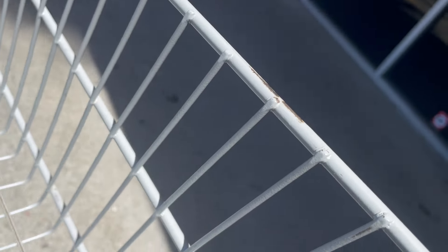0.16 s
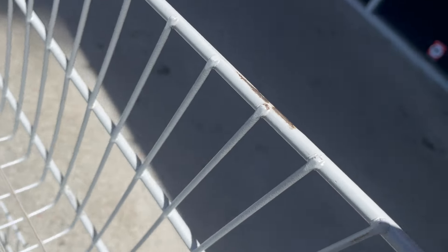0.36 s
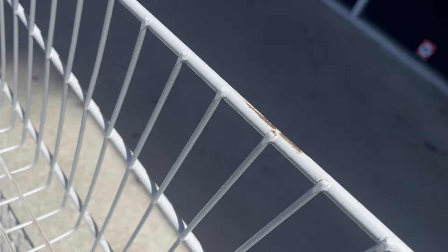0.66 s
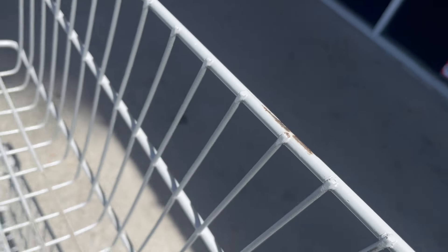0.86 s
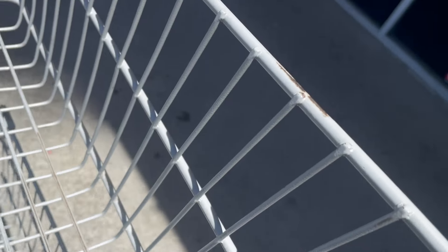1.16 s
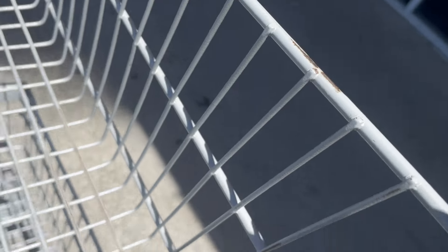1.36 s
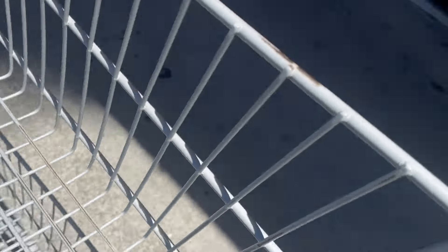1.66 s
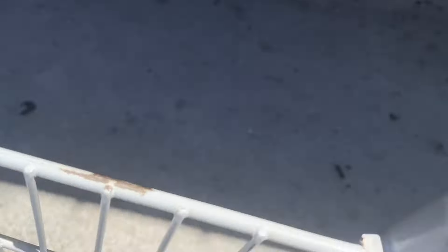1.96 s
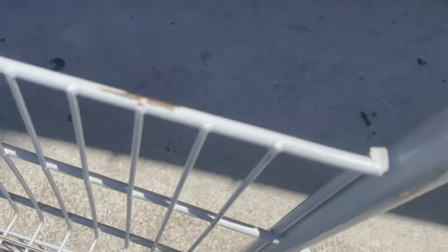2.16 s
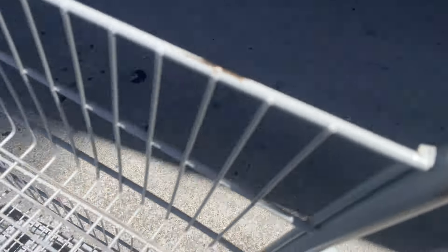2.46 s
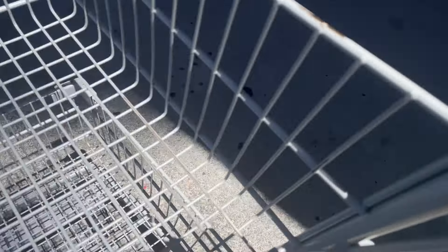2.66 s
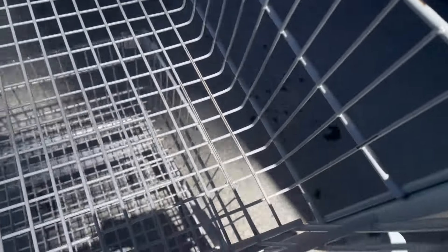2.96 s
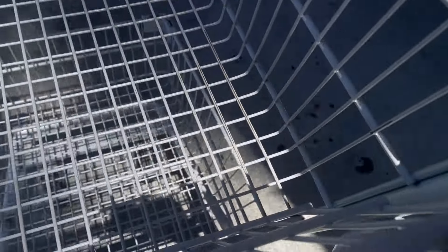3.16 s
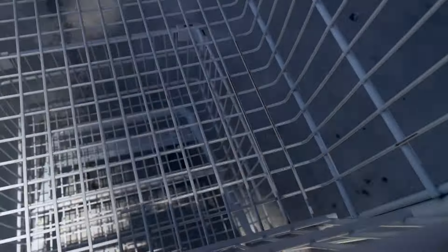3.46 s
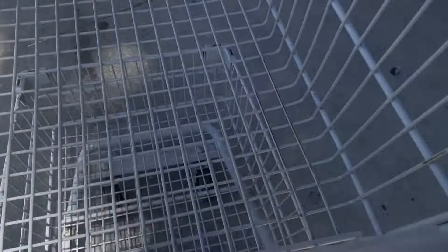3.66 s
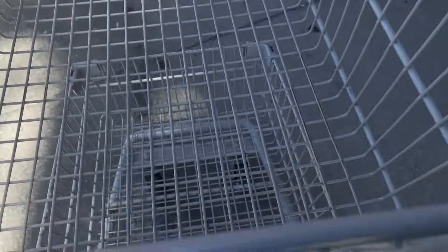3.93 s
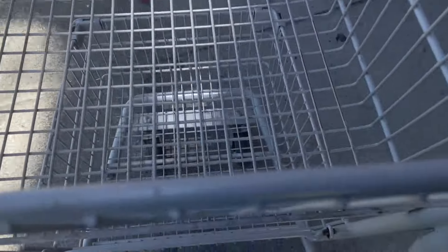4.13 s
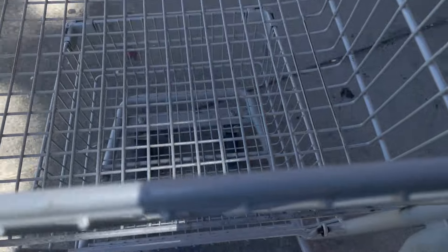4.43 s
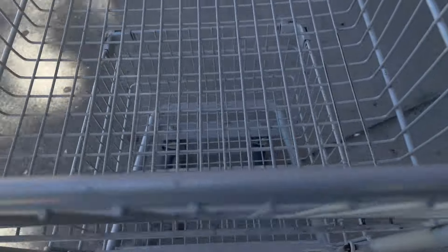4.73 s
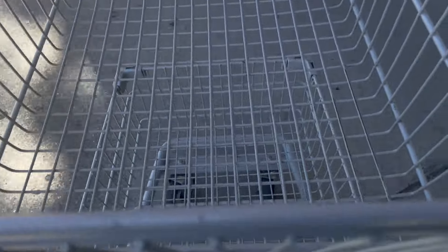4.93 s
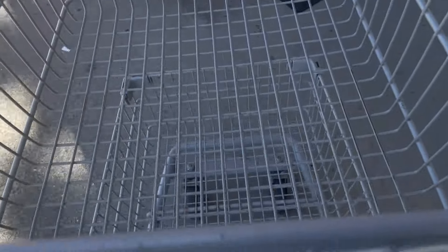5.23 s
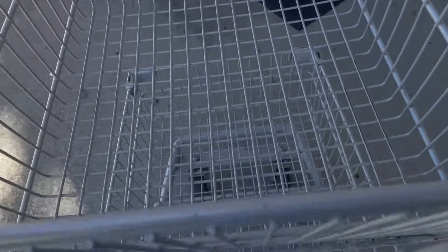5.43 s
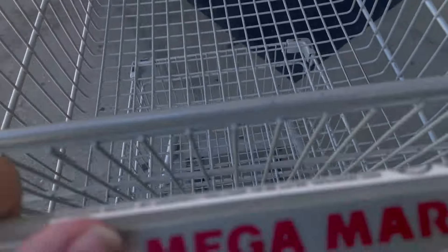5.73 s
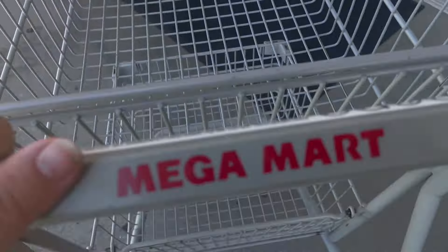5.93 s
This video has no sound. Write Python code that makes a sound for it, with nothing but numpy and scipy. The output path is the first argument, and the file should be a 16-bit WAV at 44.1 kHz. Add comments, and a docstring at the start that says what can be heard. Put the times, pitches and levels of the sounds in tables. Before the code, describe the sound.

Close-up metallic rattle of a shopping cart pushed across pavement, calm at first, then jolting hard with bright clatter and knocks before easing off.

```python
"""A wire shopping cart is pushed over asphalt: the rough ground shakes the basket, whose wires chatter in
dense ticks. Jolts set off louder bursts and dry cracks, and the wheels rumble, thud and ring through the frame.
Hollow knocks sound on the frame. A nearby engine hums, sinks in pitch and fades, over a low drone.
Noise, ticks and sine tones are shaped by resonances and level curves. Two close microphone ports
of a hand-held recorder hear it, with a phase turn between them."""
import sys
import numpy as np
from scipy import signal
from scipy.fft import rfft, irfft, next_fast_len
from scipy.io import wavfile
from scipy.ndimage import uniform_filter1d

SR = 44100
rng = np.random.default_rng(int(sys.argv[2]) if len(sys.argv) > 2 else 0)


def wav_out(sig):
    """Save sig, one row per channel (or a flat mono array), as 16-bit PCM at SR to the path in sys.argv[1]."""
    wavfile.write(sys.argv[1], SR, np.round(np.clip(np.atleast_2d(sig).T, -1, 1) * 32767).astype(np.int16))


N = 268821
PADDED = next_fast_len(N)
T = np.arange(N) / SR
FREQS = np.maximum(np.fft.rfftfreq(PADDED, 1 / SR), 1)


def from_db(db):
    """Turn decibels into gain."""
    return 10 ** (np.asarray(db) / 20)


def rms_one(x):
    """Scale to an average strength (rms) of 1."""
    return x / np.sqrt(np.mean(x ** 2) + 1e-20)


def in_time(rows):
    """Read the columns of a time table at every sample."""
    s, *columns = np.transpose(rows)
    return [np.interp(T, s, column) for column in columns]


def in_pitch(rows):
    """Read the columns of a frequency table at every FFT bin."""
    hz, *columns = np.transpose(rows)
    return [np.interp(np.log(FREQS), np.log(hz), column) for column in columns]


def colour(x, spectrum):
    """Filter x by a spectrum table, then scale to rms 1."""
    gain = from_db(in_pitch(spectrum)[0])
    return rms_one(irfft(rfft(x, PADDED) * gain, PADDED)[:N])


def drift(rate):
    """Slow random wander of rms 1, drawn at every 20th sample; a higher rate wanders faster."""
    r = np.exp(-40 * np.pi * rate / SR)
    noise = rng.standard_normal(N // 20 + 2002)
    slow = signal.lfilter([1], [1, -2 * r, r * r], noise)[2000:]
    return np.interp(np.arange(N) / 20, np.arange(len(slow)), rms_one(slow))


def resonate(x, hz, width_hz):
    """A part that rings at one pitch, with gain 1 at its peak; narrow ones ring longer."""
    r = np.exp(-np.pi * width_hz / SR)
    top = [(1 - r * r) / 2, 0, (r * r - 1) / 2]
    return signal.lfilter(top, [1, -2 * r * np.cos(2 * np.pi * hz / SR), r * r], x)


def wandering(x, hz, width_hz):
    """Three neighbours 1.8 % apart in pitch swell and fade separately, so the ring shifts and breaks up."""
    rings = [from_db(5 * drift(17.5)) * resonate(x, hz * (1 + k * 0.018), width_hz) for k in (-1, 0, 1)]
    return sum(rings) / 2


def chord(x, modes, ring=resonate):
    """Several resonances side by side, scaled together to rms 1."""
    return rms_one(sum(from_db(level_db) * ring(x, hz, width) for hz, width, level_db in modes))


def ticks(per_s, spread_db):
    """Random contacts of uneven strength, scaled to rms 1."""
    sizes = from_db(spread_db * np.minimum(rng.exponential(1, N), 5)) * rng.choice([-1, 1], N)
    return rms_one(sizes * (rng.random(N) < per_s / SR))


def lagged(x, lag_s):
    """Follow x smoothly, with lag_s as the time constant."""
    pole = np.exp(-1 / (lag_s * SR))
    return signal.lfilter([1 - pole], [1, -pole], x)


# jolts of the basket: (time [s], burst level [dB], shiver level [dB], first-contact snap level [dB])
BASKET_JOLTS = [(0.283, -31, -29.5, -28), (0.5639, -37, -36, -31), (0.6774, -34.5, -32.5, -30),
                (0.791, -44, -43, -37), (1.076, -43, -52, -35), (1.2344, -50, -28, -38),
                (1.249, -50, -39, -34), (1.267, -30, -50, -22), (1.328, -28, -56, -22),
                (1.498, -32, -33, -28), (1.545, -31, -40.5, -34), (1.682, -34, -41, -37),
                (2.01, -32.5, -39.5, -14), (2.056, -38.5, -60, -26), (2.3045, -46, -44.5, -21),
                (2.371, -34, -55, -34), (2.386, -31, -39, -26), (2.395, -45, -57, -25),
                (2.508, -40, -57, -27), (2.563, -35, -48, -35), (2.571, -31, -55, -21),
                (2.602, -32, -50, -24), (2.6177, -21.5, -28.5, -15), (2.63, -28, -45, -14),
                (2.692, -25, -43, -20), (2.721, -26, -47, -14), (2.818, -40, -50, -25),
                (2.868, -30.5, -50, -15), (2.878, -29, -25, -8), (2.947, -23, -48, -24),
                (2.963, -24, -48, -6.5), (3.1104, -22, -22, -7.5), (3.1426, -23, -45, -11),
                (3.1948, -22.5, -45, -4), (3.262, -42, -45, -11), (3.318, -26, -45, -8),
                (3.329, -23, -24, -2.5), (3.338, -28, -50, -3), (3.398, -29, -50, -16),
                (3.448, -26, -50, -9), (3.461, -27, -50, -12), (3.538, -29, -50, -4), (3.549, -34, -52, -9),
                (3.612, -49, -50, -28), (3.882, -35, -50, -8), (3.982, -28, -53, -8.5),
                (4.06, -27, -35, -12), (4.173, -27, -39, -15), (4.291, -32, -42, -14),
                (4.552, -32, -31.5, -25), (4.669, -28.5, -55, -22), (4.704, -23.5, -47, -25),
                (4.7322, -26, -40, -8), (4.769, -21.5, -40, -20), (4.811, -29, -44, -18),
                (4.823, -38, -50, -14), (5.047, -31, -79, -29), (5.1084, -18, -53, -19),
                (5.1157, -35, -24, -3.5), (5.157, -27, -50, -10), (5.178, -42, -50, -10),
                (5.288, -32, -48, -14), (5.408, -40, -63, -17), (5.524, -42, -51, -24),
                (5.601, -35, -59, -28), (5.8352, -29.5, -44, -11), (5.973, -34, -43.5, -35)]


def jolt_power(column, t60):
    """Each jolt starts at once, then its power falls 60 dB in t60 seconds."""
    kicks = np.zeros(N)
    rows = np.array(BASKET_JOLTS)
    kicks[np.round(rows[:, 0] * SR).astype(int)] = from_db(2 * rows[:, column])
    return signal.lfilter([1], [1, -from_db(-2 * 60 / t60 / SR)], kicks + 1e-18)


# steady shaking of the basket by the ground:
# (time [s], rattle level [dB], treble tilt [dB], frame-tube ring level [dB])
GROUND_SHAKING = [(0, -37, 6, -11), (.27, -45.5, -0.5, -5.5), (1.22, -50.5, -2, 1), (2.0, -51.5, 1.5, 1.5),
                  (2.36, -72, -41, 11), (2.42, -35.5, -19, -8), (2.58, -45.5, -18, -5), (2.66, -29, 0, -15),
                  (3.07, -30, -3.5, -9), (3.2, -26.5, 4, -7), (3.58, -23, 6.5, -10), (3.69, -29, 4, -4),
                  (3.87, -24.5, 9.5, 0), (4.18, -38.5, -0.5, -1), (4.69, -38.5, -6, 2.5),
                  (4.72, -30.5, 1, 5.5), (4.83, -23.5, 11, -0.5), (4.97, -39, -1.5, -3),
                  (5.08, -38.5, -7, 6), (5.14, -40.5, 18, 18), (5.3, -38.5, 8.5, 8.5), (5.6, -40, 1.5, -8),
                  (5.72, -45.5, -9, -29), (5.98, -40, -1, -20), (6.1, -55, -7, 17)]


def shaking():
    """Power of steady shaking plus shiver, power of bursts, and dB by which jolts lift the steady part."""
    steady = from_db(2 * in_time(GROUND_SHAKING)[0])
    # a jolt clatters briefly, while the shiver spreads through the mesh and lasts longer
    shiver = lagged(jolt_power(column=2, t60=0.62), lag_s=0.041)
    burst = lagged(jolt_power(column=1, t60=0.15), lag_s=0.00061)
    return steady + shiver, burst, 10 * np.log10(1 + (shiver + burst) / steady)


def mesh(x, t60, count=4):
    """Contacts fall on several mesh parts, each a crowd of modes; high ones die first, t60 is at 4 kHz."""
    t, out = np.arange(SR // 5) / SR, np.zeros(N)
    part = rng.integers(0, count, N)
    for k in range(count):
        hz, phase = rng.uniform(705.2, 15500, 150), rng.uniform(0, 2 * np.pi, 150)
        decay = np.log(1000) / t60 * np.sqrt(hz / 4000)
        waves = np.sin(2 * np.pi * np.outer(hz, t) + phase[:, None])
        modes = np.sqrt(decay)[:, None] * np.exp(-np.outer(decay, t)) * waves
        bins = rfft(modes.sum(0))
        # even out clumps of modes
        even = irfft(bins / np.sqrt(uniform_filter1d(abs(bins) ** 2, size=81) + 1e-9), len(t))
        out += signal.fftconvolve(x * (part == k), rms_one(even) / np.sqrt(len(t)))[:N]
    return out


# overall colour of the basket: (frequency [Hz], level [dB per Hz])
BASKET_SPECTRUM = [(600, -102), (1200, -6), (2000, -1), (3000, -1), (4000, 0.5), (5200, -5), (8000, -7),
                   (12000, -10), (13500, -14), (15500, -70)]


def pings(strength):
    """Thirty wires of different pitch are struck at random and ring briefly."""
    taps, wire = strength * ticks(per_s=400, spread_db=3.3), rng.integers(0, 30, N)
    pitches = np.geomspace(1700, 7800, 30) * rng.uniform(0.94, 1.03, 30)
    rings = sum(resonate(taps * (wire == k) + 1e-18, hz, 2.4 * hz / 410) for k, hz in enumerate(pitches))
    return np.sqrt(np.mean(strength ** 2)) * colour(rings, BASKET_SPECTRUM)


# strongest wire resonances: (frequency [Hz], width [Hz], level [dB])
STRONG_WIRES = [(3580, 470, 4), (3780, 50, 7), (4620, 38, 9.5), (6300, 23, 10.5), (6010, 136, 3.5),
                (7100, 25, -7), (8880, 650, 0), (11300, 49.2, -4)]
# colour of the basket as the recorder turns toward it:
# (time [s], lift near 3.2 kHz [dB], lift near 6 kHz [dB], strongest-wire ring level [dB])
RECORDER_FACING = [(0, 3.5, -9, -4.5), (1.2, 6.5, -19.5, 3), (1.9, 5, -0.5, -7), (2.52, -0.5, -7.5, -6),
                   (2.66, -2.5, 1, -3.5), (4.6, 2.5, -4, 1.5), (5.5, 5, 0, 0), (6.1, 8.5, 4.5, 5)]
FRESH_TREBLE, FRESH_TUBE = 0.91, -0.82  # change in dB per dB that jolts stand above the steady shaking


def basket():
    """Wires chatter on the mesh, a few wires and the frame tube ring out; a fresh jolt is brighter."""
    _, tilt_db, tube_db = in_time(GROUND_SHAKING)
    rattle, burst, fresh_db = shaking()

    # loose wires add sparse stray taps to the dense chatter
    chatter = ticks(per_s=1400, spread_db=1) + 0.28 * ticks(per_s=90, spread_db=0.53)
    flutter = from_db(2.06 * drift(35) + 1.37 * drift(24.0))
    force = np.sqrt(rattle) * flutter * chatter + np.sqrt(burst) * ticks(4000, 0.8)
    scale = np.sqrt(np.mean(force ** 2))

    crowd = scale * colour(mesh(force, t60=0.084) + 0.16 * force, BASKET_SPECTRUM)
    crowd = crowd + from_db(-4.5) * pings(np.sqrt(rattle + burst))
    *lifts_db, wires_db = in_time(RECORDER_FACING)
    for (hz, width), lift_db in zip([(3200, 1930), (6000, 2800)], lifts_db):
        crowd = crowd + (from_db(lift_db) - 1) * resonate(crowd, hz, width)

    treble = irfft(rfft(crowd, PADDED) / (1 + (7000 / FREQS) ** 4), PADDED)[:N]
    bright_db = np.minimum(tilt_db + FRESH_TREBLE * fresh_db, 12.0)
    treble_gain = from_db(bright_db) + 0.21 - from_db(3.0)

    wires = sum(from_db(level_db + wires_db + 4.2 * drift(6.0)) * resonate(force, hz, width)
                for hz, width, level_db in STRONG_WIRES)
    tube_gain = from_db(tube_db + FRESH_TUBE * fresh_db + 2.5 * drift(5.9))
    tube = scale * tube_gain * rms_one(wandering(force, hz=2474, width_hz=104))
    return from_db(1.0) * crowd + treble_gain * treble + wires + tube


# wheels on the ground: (time [s], rumble level [dB], rolling noise level [dB], castor drone level [dB])
WHEEL_LEVELS = [(0, -27, -34, -65), (.64, -32.5, -36, -47), (1.24, -29, -31, -85), (1.4, -33.5, -33.5, -74),
                (2.0, -30, -35, -47), (2.25, -28.5, -36.5, -64), (2.6, -26.5, -33.5, -35),
                (3.0, -31.5, -31, -33.5), (3.92, -33, -39, -33), (4.1, -36, -36.5, -38.5),
                (4.68, -37, -39.5, -41), (4.75, -30, -36.5, -30.5), (4.97, -35.5, -42.5, -44),
                (5.12, -30, -36.5, -31), (5.27, -39, -43.5, -40), (5.7, -37.5, -41, -53.5),
                (6.1, -35, -39, -74)]
# colour of the rumble: (frequency [Hz], level [dB per Hz])
RUMBLE_SPECTRUM = [(15, -33), (30, 1.5), (55, 18.5), (85, 20.5), (130, 15), (200, -65)]


def wheel_rumble():
    """Low-coloured noise whose level wanders quickly, so the rumble is lumpy."""
    rumble_db = in_time(WHEEL_LEVELS)[0]
    return from_db(rumble_db + 2.0 * drift(44.0)) * colour(rng.standard_normal(N), RUMBLE_SPECTRUM)


# colour of the rolling noise: (frequency [Hz], level [dB per Hz])
ROLLING_SPECTRUM = [(90, -7), (150, 2), (235, -1.5), (300, -6), (400, -12), (550, -10), (750, -11),
                    (1050, -9.5), (1500, -18), (3000, -44)]


def rolling_noise():
    """The grain of the asphalt taps the wheels; fresh jolts add a slight thump."""
    level_db = in_time(WHEEL_LEVELS)[1] + 0.082 * shaking()[2]
    return from_db(level_db + 2.0 * drift(13.0)) * colour(ticks(2500, 2.54), ROLLING_SPECTRUM)


# castor resonances: (frequency [Hz], width [Hz], level [dB])
CASTOR_MODES = [(506, 40, -2.5), (680, 45, -6.5), (1472, 68, 3.5)]


def castor_drone():
    """Ticks ring the castors, whose shifting resonances make a drone."""
    castor_db = in_time(WHEEL_LEVELS)[2]
    return from_db(castor_db + 1.95 * drift(11.7)) * chord(ticks(1500, 1.9), CASTOR_MODES, wandering)


# engine hum: (time [s], pitch [Hz], level [dB])
ENGINE_HUM = [(0, 123.8, -20), (.35, 129, -26.5), (.6, 125.7, -23), (.9, 128, -29), (1.1, 125.7, -23),
              (1.8, 124.1, -35.5), (2.2, 117.5, -30.5), (2.55, 112.3, -25), (2.7, 112.4, -23.5),
              (2.83, 112.6, -17), (2.92, 111.7, -19), (3.05, 107.1, -27), (3.15, 100.7, -33),
              (3.3, 98, -60)]


def engine():
    """A near-pure firing tone that wavers a little in pitch and level, and fades out at its last point."""
    hz, level_db = in_time(ENGINE_HUM)
    phase = 2 * np.pi * np.cumsum(hz + 0.9 * drift(4.3)) / SR
    fade = np.clip((ENGINE_HUM[-1][0] + 0.076 - T) / 0.11, 0, 1)
    return np.sqrt(2) * fade * from_db(level_db + 2.5 * drift(5.4)) * np.sin(phase)


# drone resonances: (frequency [Hz], width [Hz], level [dB])
DRONE_MODES = [(151.4, 6.2, 1), (230.3, 5.9, -2)]


def low_drone():
    """Noise through narrow resonances: a drone under the hum that fades at 11 dB/s from 3 s on."""
    level_db = -37.5 - 11 * np.maximum(T - 3, 0)
    return from_db(level_db) * chord(rng.standard_normal(N), DRONE_MODES)


# hollow knocks on the frame: (time [s], level before the soft start [dB], pitch [Hz])
FRAME_KNOCKS = [(.006, -16, 766), (.059, -23.5, 800), (.155, -28.5, 756), (1.974, -26, 506),
                (1.986, -27, 780), (2.003, -28, 1710), (2.026, -33, 450), (2.409, -23.5, 2700),
                (2.51, -30, 2670), (2.564, -27.5, 1110), (2.414, -31, 1610), (4.071, -17, 1430),
                (4.275, -31, 816), (4.706, -16.5, 1840), (4.707, -14, 2630), (4.712, -19.5, 1496),
                (5.094, -20, 1466), (5.834, -17, 6630)]
KNOCK_T60_S, KNOCK_ATTACK_S = 0.08, 0.00047
KNOCK_LEAD = 2.1  # radians by which the right port leads


def knocks():
    """Short hollow rings with a soft start, each with a weaker second mode 7 % higher."""
    out, after = np.zeros((2, N + SR // 5)), np.arange(SR // 5) / SR
    lead = np.array([[0], [KNOCK_LEAD]])
    for s, level_db, hz in FRAME_KNOCKS:
        shape = (1 - np.exp(-after / KNOCK_ATTACK_S)) * from_db(level_db - 60 * after / KNOCK_T60_S)
        tones = sum(gain * np.sin(2 * np.pi * ratio * hz * after + lead)
                    for ratio, gain in [(1, 1), (1.07, from_db(-8))])
        out[:, round(s * SR):][:, :len(after)] += shape * tones
    return out[:, :N]


# short wires that clink at each snap: (frequency [Hz], width [Hz], level [dB])
CLINKING_WIRES = [(3590, 140, 3.5), (5950, 140, -0.5), (6670, 106, -4.5), (7800, 220, -9)]


def snaps(t60):
    """The first contact of a jolt: a dry crack of a few milliseconds that makes short wires clink."""
    out, after = np.zeros(N + 1000), np.arange(1000) / SR
    noises = rng.standard_normal((len(BASKET_JOLTS), 1000))
    for (s, _, _, snap_db), noise in zip(BASKET_JOLTS, noises):
        out[round(s * SR):][:1000] += np.sign(noise) * from_db(snap_db - 60 * after / t60)
    band = signal.butter(2, [450, 12000], "band", fs=SR, output="sos")
    crack = signal.sosfilt(band, out[:N] + 1e-18)
    clinks = sum(from_db(level_db) * resonate(crack, hz, width) for hz, width, level_db in CLINKING_WIRES)
    return 0.89 * crack + clinks


# dull thuds of a wheel over a bump: (time [s], starting noise level before the filter [dB])
WHEEL_THUDS = [(1.24, -16), (1.987, -34), (2.962, -19), (4.708, -16), (5.107, -24)]


def thuds():
    """A broad dull knock of noise that starts at once and falls 60 dB in 0.35 s, cut off after 0.25 s."""
    out, after = np.zeros(N + SR // 4), np.arange(SR // 4) / SR
    noises = rng.standard_normal((len(WHEEL_THUDS), SR // 4))
    for (s, level_db), noise in zip(WHEEL_THUDS, noises):
        out[round(s * SR):][:SR // 4] += noise * from_db(level_db - 60 * after / 0.35)
    return signal.lfilter(*signal.butter(1, [180, 2170], "band", fs=SR), out[:N])


# basket-floor resonances: (frequency [Hz], width [Hz], level [dB])
FLOOR_MODES = [(380, 95, 2), (614, 60, 7.1), (751, 37, 10.2)]


def floor_boom():
    """The basket floor rings 4 dB below the castor level setting, after a steep rise up to 3.28 s."""
    level_db = in_time(WHEEL_LEVELS)[2] - 4 - 69 * np.maximum(3.28 - T, 0)
    return from_db(level_db) * chord(ticks(1500, 4.9), FLOOR_MODES)


# thin ring as the cart slows: (frequency [Hz], width [Hz], level [dB])
SLOWING_MODES = [(1783, 58, 13), (6550, 130, 0)]


def slowing_ring():
    """A thin, unsteady ring as the cart slows, rising at 18 dB/s until 5.88 s."""
    level_db = -36.5 - 18 * np.maximum(5.88 - T, 0)
    return from_db(level_db) * chord(ticks(3000, 2.7), SLOWING_MODES, wandering)


def wheels():
    """Everything the wheels excite: rumble, rolling noise, thuds and the rings of castors and basket floor."""
    return wheel_rumble() + rolling_noise() + castor_drone() + thuds() + floor_boom() + slowing_ring()


# The three port tables share their columns: (frequency [Hz], phase by which the right leads [rad],
# left-right likeness [0-1], left minus right level [dB])
# microphone ports above 1 kHz
PORTS_HIGH = [(1050, 3.6, 0.84, -1), (1500, 4.0, 0.86, -2), (1800, 3.75, 0.86, 0.2), (2400, 3.9, 0.93, 0),
              (3100, 4.3, 0.72, 0), (3800, 4.6, 0.66, -0.5), (4500, 4.1, 0.7, -0.5), (5100, 3.1, 0.85, 0),
              (5850, 0.6, 0.45, 0), (6600, 1.5, 0.25, 0), (7900, 2.0, 0.4, 0), (8600, 1.4, 0.6, -0.3),
              (9300, 1.8, 0.7, -0.3), (11400, 2.1, 0.7, 0), (13400, 3.0, 0.95, 0)]
# below 1 kHz, before the recorder is turned: a wide bass
PORTS_LOW_WIDE = [(20, 0.82, 1, 9), (50.6, 2.6, 1, 1), (124, 2.21, 0.98, -5), (330, 2.04, 0.39, 1),
                  (525, 2.8, 0.6, -1), (700, 3.14, 0.93, -1), (860, 3.3, 0.8, -1)]
# below 1 kHz, after the recorder is turned: a centred bass
PORTS_LOW_CENTRED = [(39.8, 0.0065, 1, 5.5), (280, 0.019, 1, -1.3), (420, 0.23, 0.55, -3.5),
                     (560, 2.3, 0.11, -2), (800, 2.95, 0.46, 1)]


def ports(shared, own):
    """The ports share one sound and differ by another; the right is turned in phase, the bass centres later."""
    wide = np.clip((2.91 - T) / 0.05, 0, 1)  # centred from 2.91 s, after a 0.05 s crossfade
    shared, own, out = rfft(shared, PADDED), rfft(own, PADDED), 0
    for rows, weight in [(PORTS_LOW_WIDE, wide), (PORTS_LOW_CENTRED, 1 - wide)]:
        turn, alike, pan_db = in_pitch(rows + PORTS_HIGH)
        share = np.clip(alike, 0, 1)
        mid, side = np.sqrt((1 + share) / 2) * shared, np.sqrt((1 - share) / 2) * own
        left = (mid + side) * from_db(pan_db / 2)
        right = (mid - side) * from_db(-pan_db / 2) * np.exp(1j * turn)
        out = out + weight * irfft(np.array([left, right]), PADDED)[:, :N]
    return out


def scene():
    """Two draws of the cart: one common to both ports, one that tells them apart."""
    cracks = snaps(t60=.009)
    shared = basket() + wheels() + engine() + low_drone() + cracks
    own = basket() + wheels()
    # a little of each crack also reaches both ports in step
    return ports(shared, own) + knocks() + 0.15 * cracks


def record(dry):
    """Round the peaks, then cut the top so that 16 kHz and above is at least 70 dB down."""
    rounded = .8 * np.tanh(dry / .8)
    return signal.sosfilt(signal.cheby2(12, 70, 16000, fs=SR, output="sos"), rounded)


dry = scene()
out = record(dry)
wav_out(out)
```